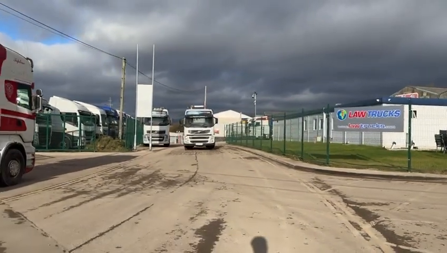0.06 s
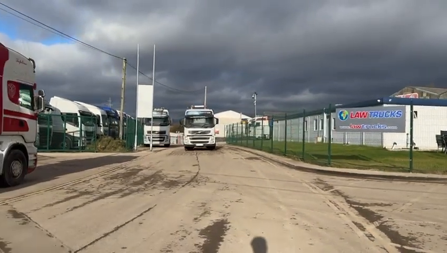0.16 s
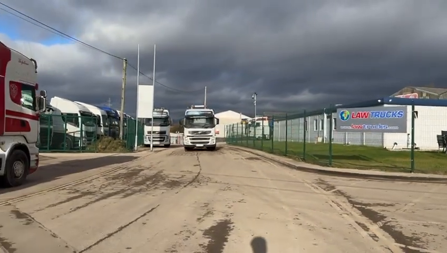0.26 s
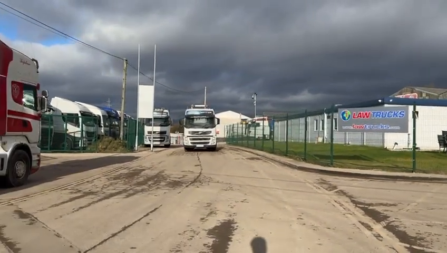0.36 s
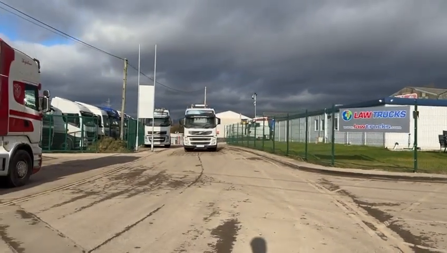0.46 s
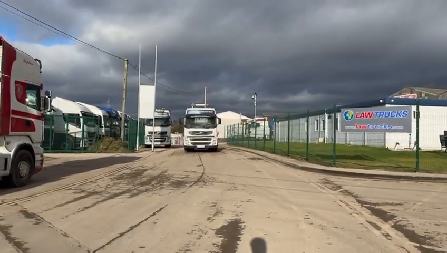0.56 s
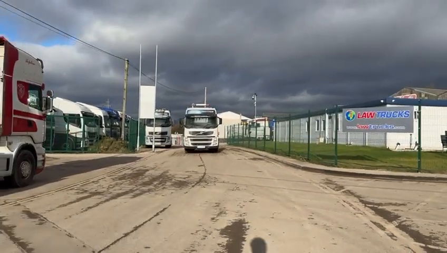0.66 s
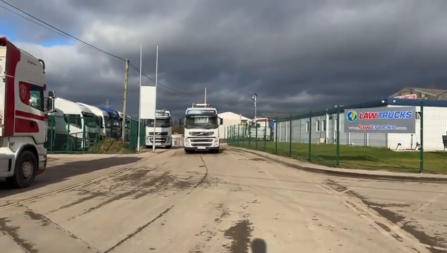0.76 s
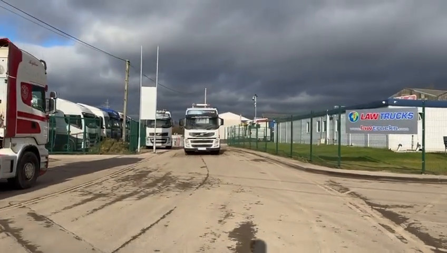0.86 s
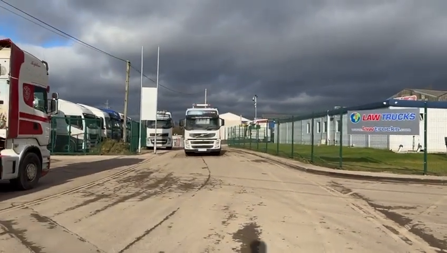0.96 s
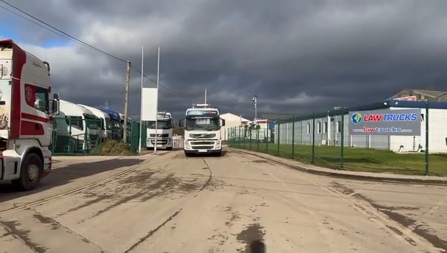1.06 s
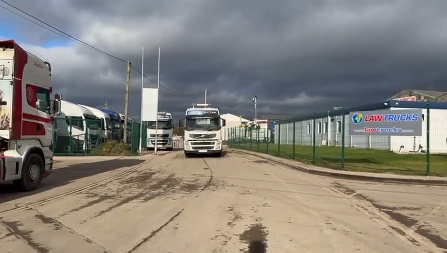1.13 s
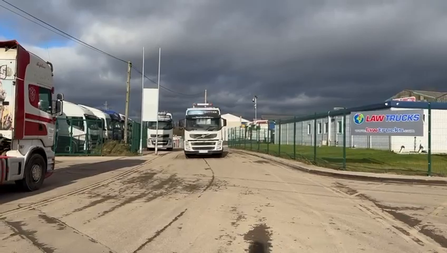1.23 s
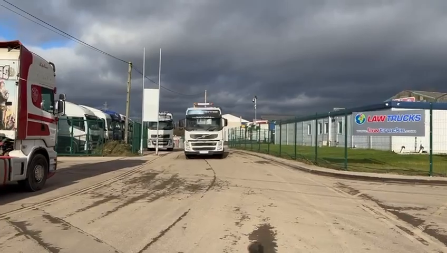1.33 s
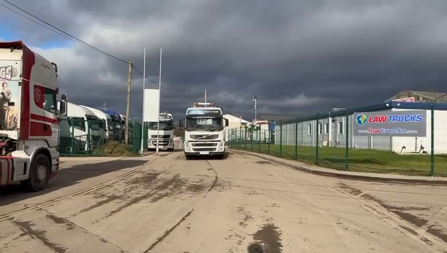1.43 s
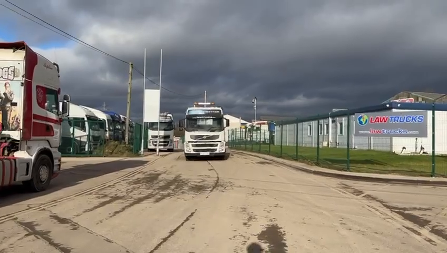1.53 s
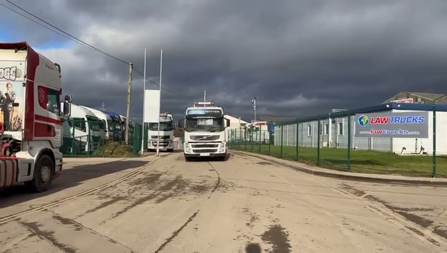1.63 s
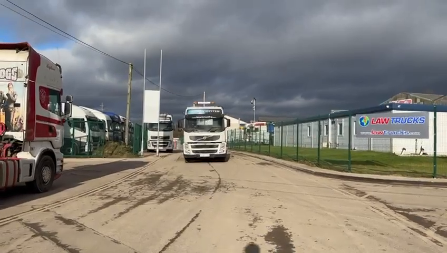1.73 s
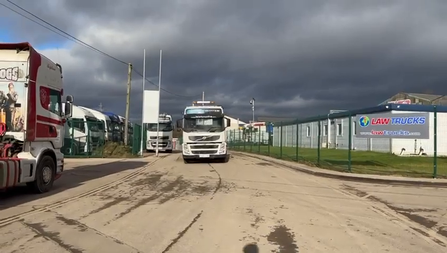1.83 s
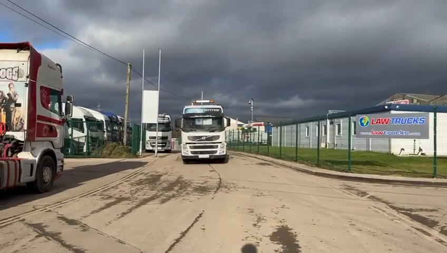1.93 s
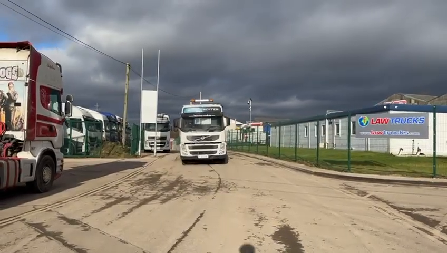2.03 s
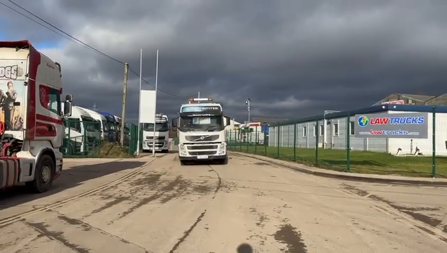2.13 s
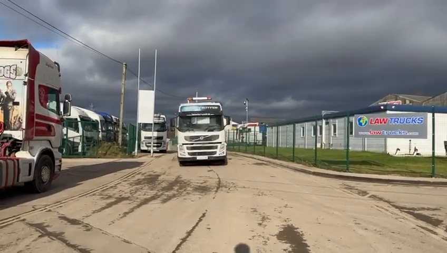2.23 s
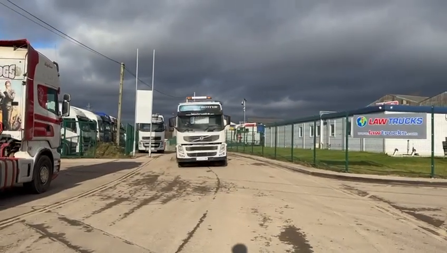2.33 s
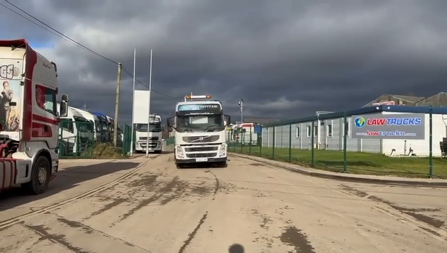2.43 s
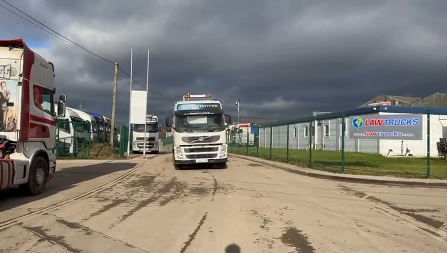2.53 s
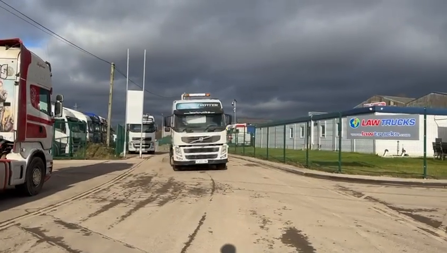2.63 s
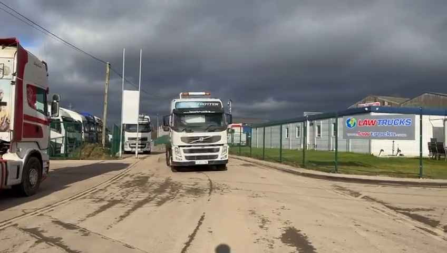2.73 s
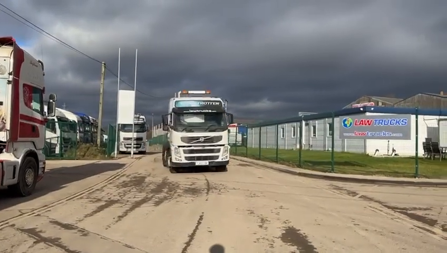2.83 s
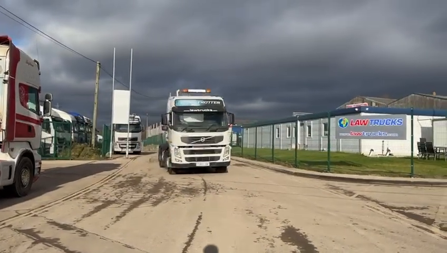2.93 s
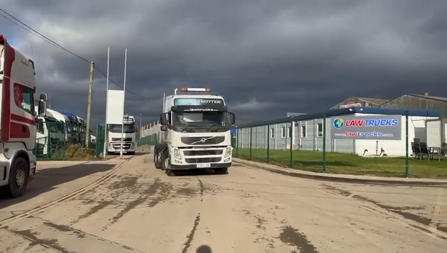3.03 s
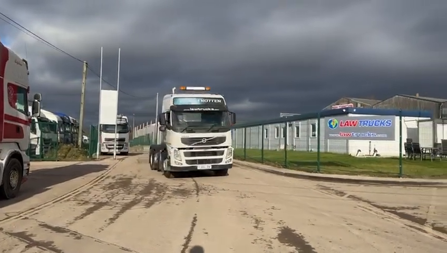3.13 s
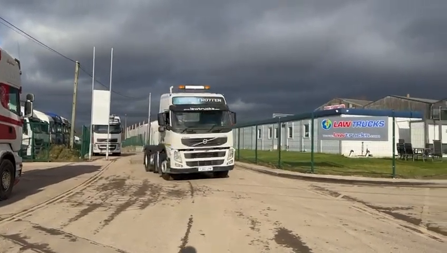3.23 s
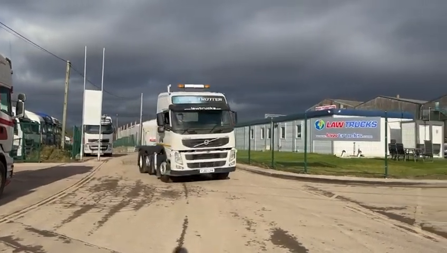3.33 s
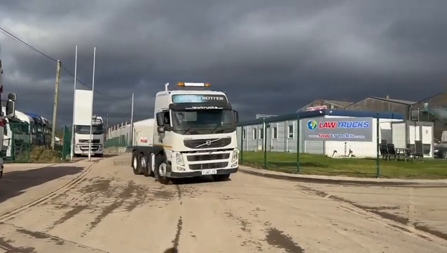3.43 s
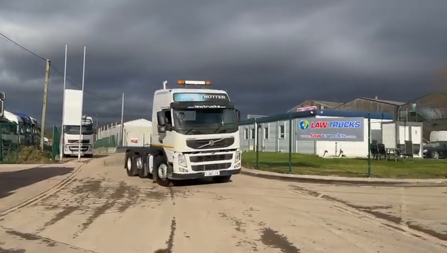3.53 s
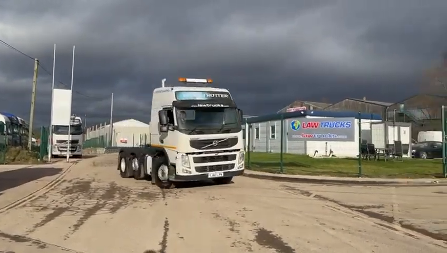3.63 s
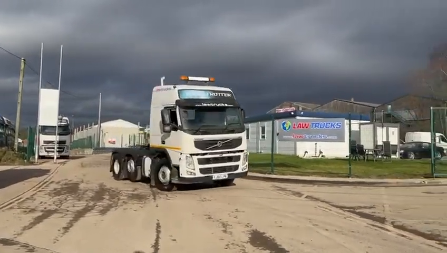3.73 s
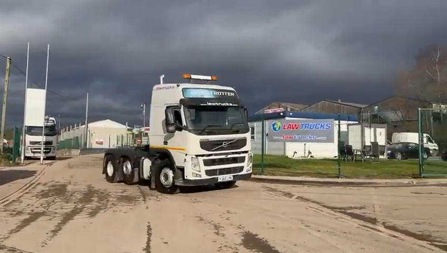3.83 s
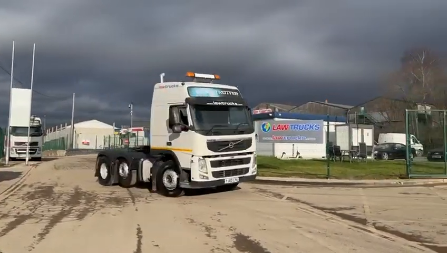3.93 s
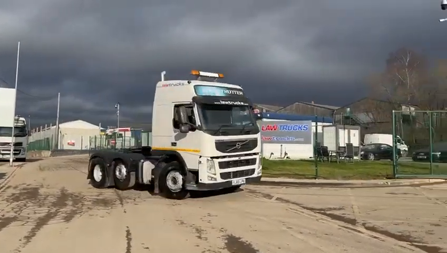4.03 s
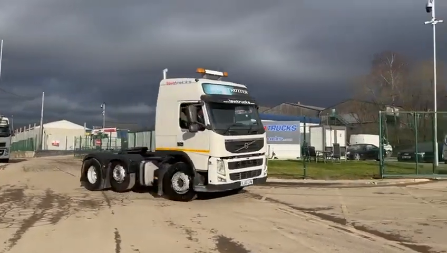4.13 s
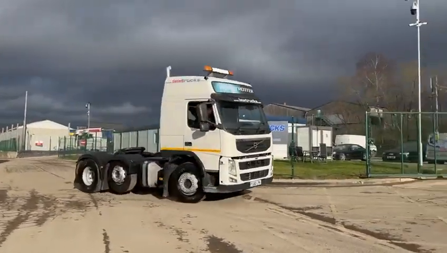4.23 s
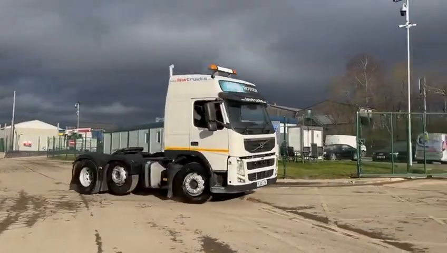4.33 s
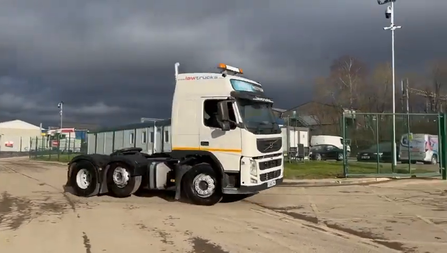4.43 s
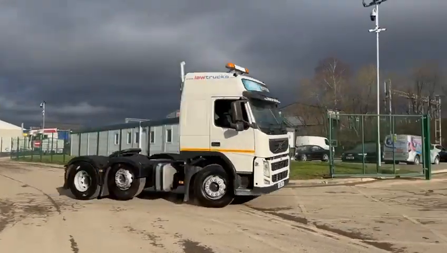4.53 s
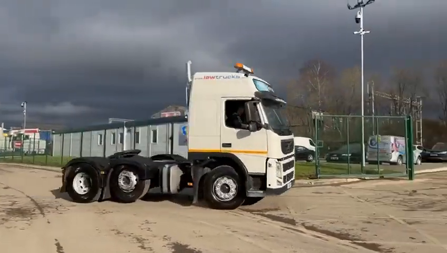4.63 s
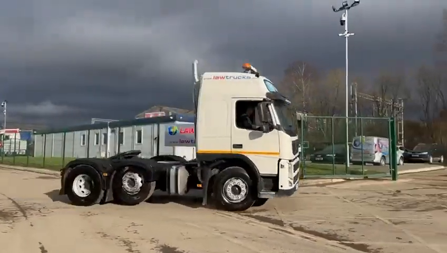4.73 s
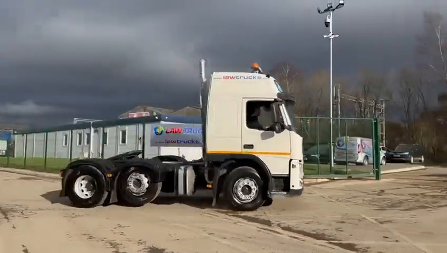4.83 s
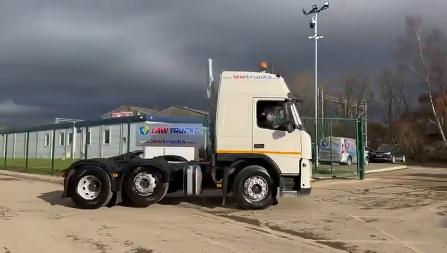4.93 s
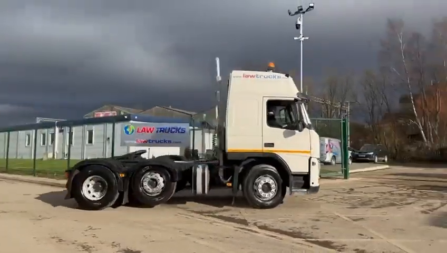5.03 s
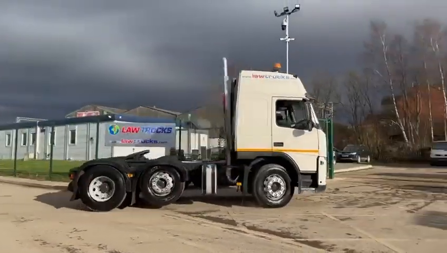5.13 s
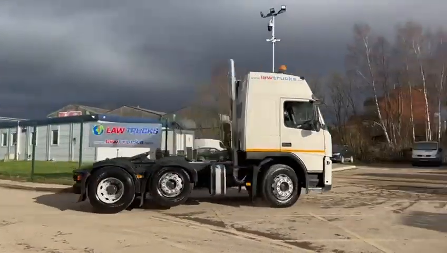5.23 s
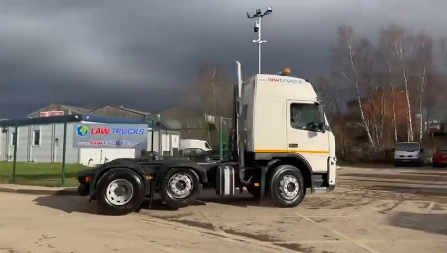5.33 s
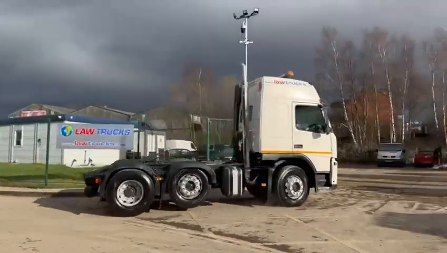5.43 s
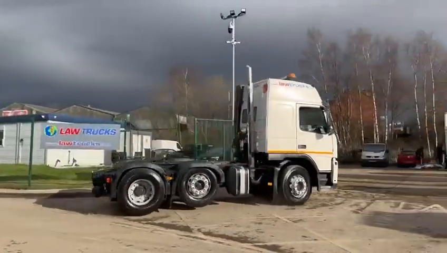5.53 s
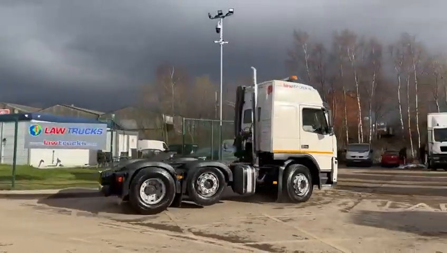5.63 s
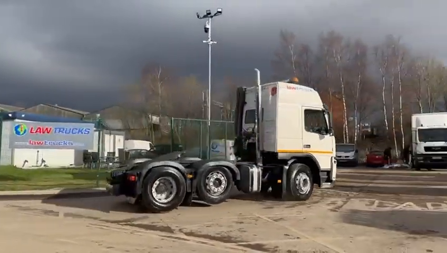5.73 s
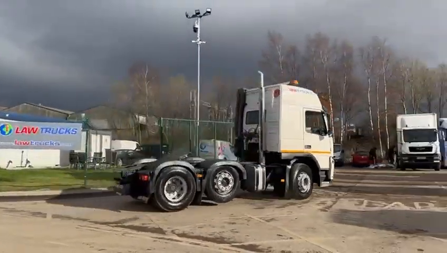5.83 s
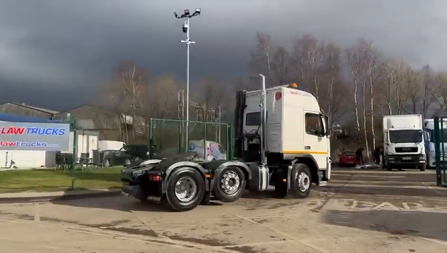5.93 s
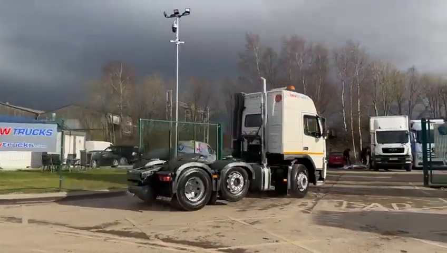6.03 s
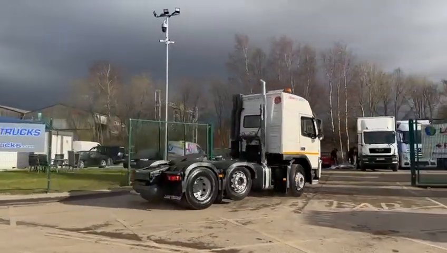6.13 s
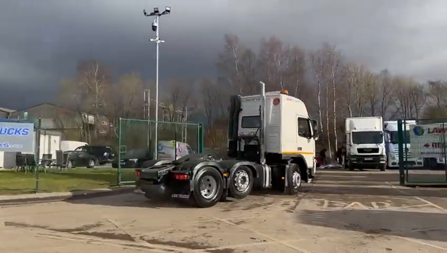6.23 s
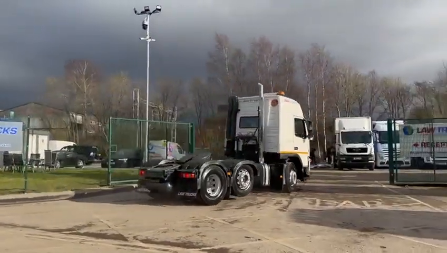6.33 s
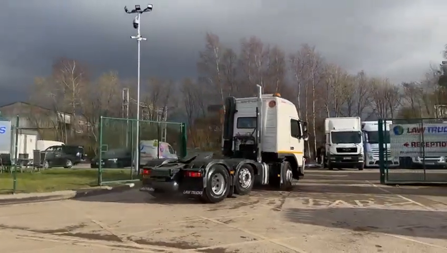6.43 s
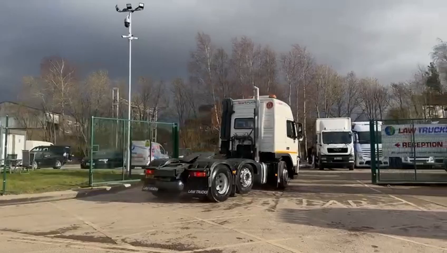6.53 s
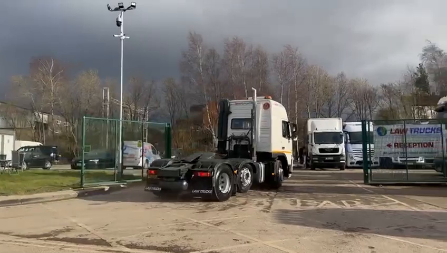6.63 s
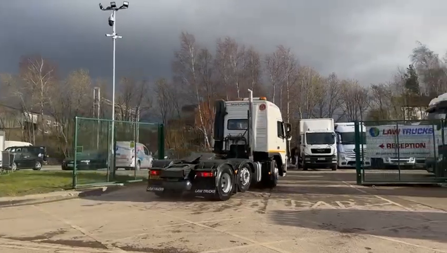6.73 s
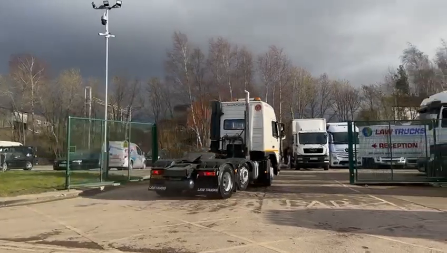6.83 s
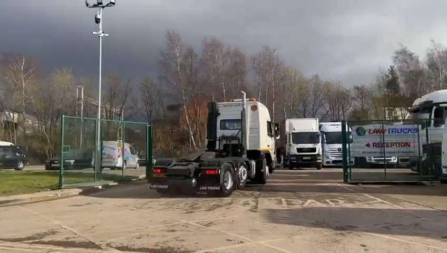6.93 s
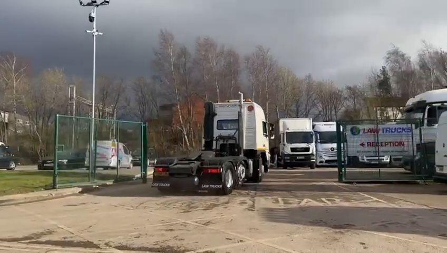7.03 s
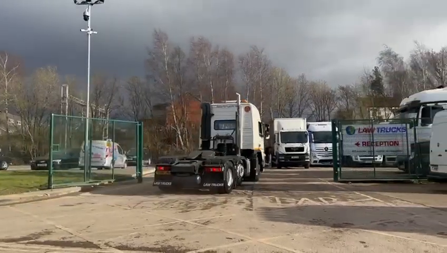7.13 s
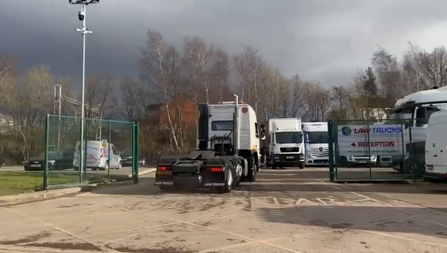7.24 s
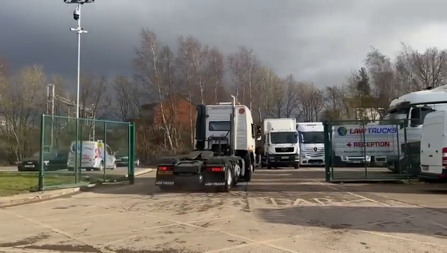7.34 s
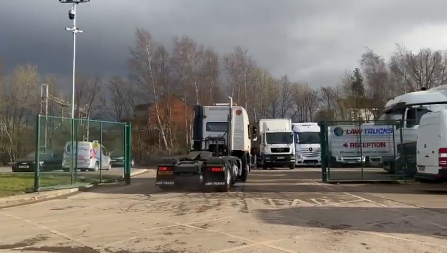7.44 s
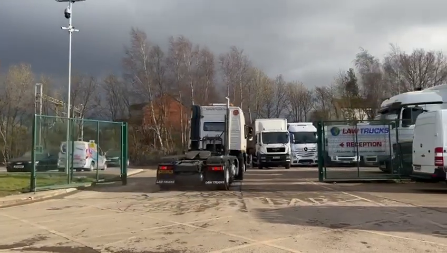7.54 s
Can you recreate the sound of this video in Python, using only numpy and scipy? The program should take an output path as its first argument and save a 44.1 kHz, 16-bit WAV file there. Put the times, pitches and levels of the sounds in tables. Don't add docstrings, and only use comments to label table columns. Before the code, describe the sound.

A heavy diesel lorry booms and clatters closer, hisses air, toots its horn twice, then passes and turns away, dropping in revs.

```python
import sys
import numpy as np
from scipy import signal
from scipy.fft import rfft, irfft, next_fast_len
from scipy.io import wavfile
from scipy.ndimage import uniform_filter1d, minimum_filter1d

SR = 44100
rng = np.random.default_rng(int(sys.argv[2]) if len(sys.argv) > 2 else 0)


def volts_from_decibels(level):
    exponent = np.asarray(level, float) / 20
    return 10 ** exponent


def store_pcm(level_fs):
    pcm = np.round(np.clip(level_fs, -1, 1) * 32767).astype(np.int16)
    wavfile.write(sys.argv[1], SR, np.atleast_2d(pcm).T)


N = 333837
TIME = np.arange(N) / SR


def evened(x):
    return x / np.sqrt(np.mean(x ** 2) + 1e-20)


def along(rows):
    s, *columns = np.transpose(rows)
    return [np.interp(TIME, s, c) for c in columns]


def swell(start, end):
    return np.sin(np.pi * np.clip((TIME - start) / (end - start), 0, 1)) ** 0.5


def shaped(x, points):
    f, db = np.transpose(points)
    size = next_fast_len(len(x))
    hz = np.fft.rfftfreq(size, 1 / SR)
    gain = volts_from_decibels(np.interp(np.log(hz + 1), np.log(f + 1), db))
    return irfft(rfft(x, size) * gain, size)[:len(x)]


def ring(x, hz, width):
    pole = np.exp((2j * np.pi * hz - np.pi * width) / SR)
    return 2 * signal.lfilter([(1 - abs(pole)) ** 2], [1, -2 * pole, pole ** 2], x).real


def resonances(x, rows):
    return sum(volts_from_decibels(db) * ring(x, hz, width) for hz, width, db in rows)


def lumps(hz):
    knots = rng.standard_normal(3000)
    curve = np.interp(TIME * hz, np.arange(len(knots)), knots)
    return evened(uniform_filter1d(curve, int(SR / hz)))


# time_s, level_db
EXHAUST = [(0.0, -22.5), (.1, -33), (.2, -15.5), (.5, -23), (.6, -35), (.7, -21), (.95, -45), (1.85, -53),
           (2.1, -33.5), (2.8, -24.5), (3.5, -39), (3.72, -17.5), (4.0, -15.5), (4.5, -26.5), (4.85, -16),
           (5.25, -17.5), (5.95, -26.5), (6.6, -54)]
# firing_order, from_s, to_s, top_db
DRONES = [(1, -1, 0.13, -38), (1, -2.7, .48, -39), (1, 2, 3.6, -36.5), (1, 3.5, 4.5, -28.5),
          (1, 4.5, 6.03, -25), (2, 6.3, 6.6, -36), (2, 6.85, 7.15, -35), (2, 7.12, 7.85, -22),
          (3, 6.88, 7.2, -30), (3, 5.2, 6.08, -26.5), (3, 0.9, 0.15, -31.5), (3, 1.4, 1.0, -27),
          (3, 6, 5.7, -33), (5, 7, 7.25, -39.5), (4, 6.5, 7.6, -42.5)]
SINGING_ORDERS = np.array([24, 32, 36, 40, 32, 36, 24, 24, 30, 22, 38, 42, 21, 36, 40, 26]) / 6
# from_s, to_s, top_db
SINGING = [(.02, .4, -33), (-.1, .5, -33), (-.1, .35, -35), (.46, .85, -29.5), (.42, .9, -29),
           (.62, 1.08, -34), (.5, 1.08, -36), (4.5, 6.0, -34), (4.3, 5.8, -34), (4.4, 5.6, -36),
           (4.9, 5.5, -33), (5.6, 6.2, -37), (5.5, 6.0, -36), (5.95, 6.25, -36), (3.5, 4.6, -41),
           (3.7, 4.8, -38)]


def exhaust(turns):
    boom = volts_from_decibels(along(EXHAUST)[0]) * np.cos(4 * np.pi * turns + .38)
    for order, start, end, db in DRONES:
        tone = np.cos(2 * np.pi * order * turns + .38 * (order - 1))
        boom += volts_from_decibels(db) * swell(start, end) * tone
    for order, (start, end, db) in zip(SINGING_ORDERS, SINGING):
        tone = np.cos(2 * np.pi * (order * turns + rng.random()))
        boom += volts_from_decibels(db) * swell(start, end) * tone
    return np.sqrt(2) * boom


# pitch_hz, width_hz, level_db
SILENCER = [(200, 118, -4.5), (277.4, 138, 1), (331, 34, 2), (405.5, 48, -4.5), (520, 256, -10.5)]


def silencer(force, fires, puffs):
    clean = 0.41
    drive = np.sqrt(clean) * evened(force * fires) + np.sqrt(1 - clean) * evened(puffs)
    return evened(resonances(drive, SILENCER))


# pitch_hz, width_hz, level_db
KNOCK_RING = [(330, 45, -2), (382, 45, 0), (430, 60, -9)]


def knock(force, fires, cylinder):
    hard = force ** 0.25 * fires * (cylinder == 0)
    start, end = 2.9, 6.35
    near_db = -38 + 3.2 * (TIME - start)
    gain = volts_from_decibels(-45) + volts_from_decibels(near_db) * swell(start, end) ** 2
    return gain * evened(resonances(hard, KNOCK_RING))


# pitch_hz, level_db per Hz
CLATTER = [(280, -59.5), (480, -17), (628, -6), (768, -1), (996, 1.5), (1120, -1.5), (1310, -16.5),
           (1400, -9.5), (1820, -28.5), (3080, -120)]
# pitch_hz, level_db per Hz
HISS = [(760, -17), (1300, -3), (1950, -2), (2160, 1), (2340, 0), (2740, -4), (3860, -4.5), (4370, -9.5),
        (5940, -15), (7400, -15), (8290, -17.5), (9370, -23), (10600, -30.5), (13800, -78), (22000, -120)]


def gated_noise(gate, floor, lump_db, lump_hz, colour):
    noise = (floor + gate) * volts_from_decibels(lump_db * lumps(lump_hz)) * rng.standard_normal(N)
    return evened(shaped(noise, colour))


# pitch_hz, width_hz, from_s, to_s, top_db
NARROW_BANDS = [(525, 136, 1.64, 4.02, -36.5), (1445, 150, 5.8, 7.64, -47.5), (1976, 24, 3.26, 5.7, -49),
                (8250, 190, 0.44, 1, -49.5), (528, 76, 5.8, 7.6, -43.5), (164, 85, 6.6, 5.8, -38),
                (2347, 77, 2.5, 3.5, -49), (370, 90, 6.1, 7.3, -38.5), (5650, 730, 4.3, 5.95, -50)]


def narrow_bands(puffs):
    return sum(volts_from_decibels(db) * swell(start, end) * evened(ring(puffs, hz, width))
               for hz, width, start, end, db in NARROW_BANDS)


# time_s, firings_per_s
SPEED = [(0.0, 55.8), (0.2, 57.2), (0.4, 57.6), (0.55, 54.6), (1.0, 45.5), (1.2, 43.5), (1.45, 47.0),
         (1.7, 54.5), (1.9, 55.8), (2.3, 56.8), (3.3, 57.3), (3.7, 56.1), (4.3, 54.9), (5.3, 51.35),
         (5.75, 50.4), (6.65, 42.2), (7.15, 33.8), (7.57, 30.8)]
# time_s, nearness_db, load (0-1)
ENGINE = [(0.0, -0.5, 0.85), (.3, 0, 0.83), (.55, -4.5, 0.9), (.8, -7.5, 1), (1.0, -5.5, 0.9),
          (1.42, -10.5, 0.05), (1.85, -13, 0.6), (2.0, -7, 0.3), (2.5, -5.5, 0.2), (2.9, -4.5, 0.6),
          (3.3, -5, 0), (3.8, -3, 0), (4.1, 0, 0.4), (4.6, -1.5, .75), (5.3, 0, 0.89), (5.65, 0, .8),
          (6.05, -6, 0.52), (7.57, -15, 0.7)]
CYLINDERS_DB = [-8, -5, -2, 0.5, -8, 0.5]
# from_s, to_s, hiss_gain_db
SIDE_ON = (4.2, 5.97, 1.88)


def engine():
    turns = np.cumsum(along(SPEED)[0]) / SR
    near_db, load = along(ENGINE)
    firings = turns - 6 * .67 + .4 + 6
    count = np.floor(firings).astype(int)
    cylinder = count % 6
    fires = np.diff(count, prepend=count[0]) > 0
    chance_db = 0.99 * rng.standard_normal(count[-1] + 1)[count]
    force = volts_from_decibels(np.take(CYLINDERS_DB, cylinder) + chance_db)
    gate = np.exp(-(firings % 1) / 0.69)
    puffs = (1.2 + force * gate) * rng.standard_normal(N)

    body = volts_from_decibels(-39.5 + near_db + 17.5 * load) * silencer(force, fires, puffs)
    clatter = volts_from_decibels(-28.5 + near_db - 3 * load) * gated_noise(gate, 1.3, 0.61, 12, CLATTER)
    hiss_db = -38.5 + 0.49 * near_db + SIDE_ON[2] * swell(SIDE_ON[0], SIDE_ON[1])
    hiss = volts_from_decibels(hiss_db) * gated_noise(gate, 1.7, 0.5, 15, HISS)
    return exhaust(turns) + body + knock(force, fires, cylinder) + clatter + hiss + narrow_bands(puffs)


# start_s, air_on_s, release_s, level_db, echo_delay_s (near wall)
TOOTS = [
    (1.046, .182, .075, -7, .00554),
    (1.506, .15, .036, -7.5, .00585),
]
TOOT_DB = [-30, -11, 0.8, -2.8, -7.3, -13.5, -26]
TOOT_TREBLE_DB = [-2, -2, 2, -.2, 1.5, 1, -4]
TOOT_BREATH = [.5, .7, .35, .2, .2, .6, .3]
# harmonic, level_db
FIRST_TRUMPET = [(1, 0), (2, -14), (3, -31), (4, -28), (5, -32), (6, -27), (7, -27), (8, -31), (9, -28),
                 (10, -38), (11, -36), (12, -40), (13, -40), (14, -44), (15, -32), (16, -37), (17, -37),
                 (18, -39), (19, -41), (20, -42), (21, -32), (22, -37), (23, -40), (24, -45), (25, -51),
                 (26, -54)]
# harmonic, level_db
SECOND_TRUMPET = [(1, 0), (2, -9), (3, -26), (4, -26), (5, -40), (6, -21), (7, -23), (8, -30), (9, -30),
                  (10, -31), (11, -30), (12, -32), (13, -31), (14, -41), (15, -31), (16, -34), (17, -27),
                  (18, -33), (19, -32), (20, -35), (21, -37), (22, -39), (23, -33), (24, -34), (25, -42),
                  (26, -54)]


def toot(start, hold, release, top_db, orders):
    puff_s, attack_s, settle_s = 0.01, .02, 0.044
    fading = hold + .35 * release
    stages = start + np.array([0, puff_s, attack_s, settle_s, hold, fading, hold + release])
    db, treble_db, breath = along(np.transpose([stages, TOOT_DB, TOOT_TREBLE_DB, TOOT_BREATH]))
    sharp_hz = np.interp(TIME, stages[[0, 3, 4, 6]], [5.5, 0, 0, 15])
    turns = np.cumsum(405.9 + sharp_hz) / SR
    on = slice(round(stages[0] * SR), round(stages[-1] * SR))
    sound = np.zeros(N)
    for k, order_db in orders:
        upper = k > 2
        waver = evened(volts_from_decibels(upper * 2.4 * lumps(26)[on]))
        level = volts_from_decibels(order_db + upper * treble_db[on])
        lag = .6 * (k - 1) ** 2
        sound[on] += level * waver * np.cos(2 * np.pi * k * turns[on] - lag)
    rasp_colour = [(300, -29), (1500, -12.0), (3000, -5.5), (7000, -6), (10500, -18.0), (12500, -67)]
    rasp = evened(shaped(rng.standard_normal(N), rasp_colour))
    sound[on] += (volts_from_decibels(-12) * breath ** 2 * rasp)[on]
    return np.sqrt(2) * volts_from_decibels(top_db + db) * sound


# time_s, level_db
AIR = [(0, -45), (.4, -47), (.5, -38.5), (.75, -41), (1.03, -37.5), (1.09, -53), (1.3, -47.5),
       (1.95, -49.5), (2.2, -64.5)]
# pitch_hz, level_db per Hz
AIR_COLOUR = [(2060, -35), (3500, -6), (5910, -9.5), (6390, -10.5), (6790, -12), (7490, -2.5), (8330, -16),
              (9710, -18.5), (10600, -45.5), (13800, -72), (22000, -120)]


def air():
    return volts_from_decibels(along(AIR)[0]) * evened(shaped(rng.standard_normal(N), AIR_COLOUR))


def sparse_tail(seconds, start):
    taps = np.zeros(int(seconds * SR))
    at = np.arange(start, len(taps) - 20, 20)
    taps[at + rng.integers(0, 20, len(at))] = rng.choice([-1., 1.], len(at))
    return taps


# pitch_hz, t60_s
YARD = [(400, 0.7), (900, 0.29), (2500, 0.38), (9000, 0.11)]


def yard(x):
    hz, t, z = signal.stft(sparse_tail(1, start=1300), SR, nperseg=256)
    t60 = np.interp(hz, *np.transpose(YARD))[:, None]
    tail = signal.istft(z * volts_from_decibels(-60 * t / t60), SR, nperseg=256)[1]
    return signal.fftconvolve(x, tail / np.linalg.norm(tail))[:N]


def scattered(x):
    z = signal.stft(x, nperseg=1024, noverlap=768)[2]
    phases = np.exp(2j * np.pi * rng.random(z.shape))
    return 2 * signal.istft(z * phases, nperseg=1024, noverlap=768)[1][:N]


# pitch_hz, level_db
RUMBLE_COLOUR = [(20, -32), (35, -8), (60, 4.5), (90, 2), (170, 1), (260, -4), (500, -7), (900, -54),
                 (3000, -93)]
# from_s, to_s, gain_db
BREEZE = [
    (0.434, 0.898, 4),
    (1.03, 2.094, 7),
    (2.698, 3.34, 3),
    (5.2, 5.745, -1),
]
# time_s, peak_db, length_s, brightness_hz
GUSTS = [(.08, -24.5, 0.064, 150), (.2, -21, 0.044, 400), (1.0, -24.5, 0.077, 250),
         (1.15, -20.5, 0.025, 200), (1.211, -18.5, 0.022, 433), (1.28, -43.5, 0.054, 200),
         (1.339, -41.5, 0.055, 150), (1.48, -24, 0.089, 350), (1.7, -34.5, 0.052, 600),
         (1.771, -26, .08, 200), (1.935, -19.5, .012, 600), (1.95, -18.5, 0.027, 130),
         (1.965, -31, 0.0053, 450), (2.002, -24.5, 0.036, 220), (2.361, -19.5, 0.019, 150),
         (2.422, -26, 0.029, 250), (2.85, -43.5, 0.039, 200), (3.101, -23, 0.044, 250),
         (6.1, -26.5, 0.075, 300), (6.375, -22.5, 0.055, 150), (7.043, -42, 0.033, 150)]


def wind():
    breeze_db = sum(db * swell(start, end) for start, end, db in BREEZE)
    rumble_db = -30.5 + 0.39 * along(ENGINE)[0] + breeze_db + 2.13 * lumps(20)
    out = volts_from_decibels(rumble_db) * evened(shaped(rng.standard_normal(N), RUMBLE_COLOUR))
    t = (np.arange(8192) - 4096) / SR
    for s, db, length, hz in GUSTS:
        colour = [(35, -28), (85, 0), (hz, 0), (2 * hz, -14), (4 * hz, -40), (16 * hz, -110)]
        bump = evened(shaped(rng.standard_normal(8192), colour))
        bump *= volts_from_decibels(db) * np.exp(-(2 * t / length) ** 2)
        part = out[max(round(s * SR) - 4096, 0):][:8192]
        part += bump[-len(part):]
    return out


# pitch_hz, level_db
ECHO_COLOUR = [(420, -22), (800, -16), (1600, -11), (2400, -14), (6000, -19)]


def scene():
    toots = [toot(*row[:4], orders) for row, orders in zip(TOOTS, (FIRST_TRUMPET, SECOND_TRUMPET))]
    horn = sum(toots)
    wall = volts_from_decibels(-11) * sum(np.roll(sound, round(row[4] * SR)) for row, sound in zip(TOOTS, toots))
    echoes = shaped(yard(horn), ECHO_COLOUR)
    horn_level = np.sqrt(abs(uniform_filter1d(horn ** 2, 1500)))
    duck = 1 / (1 + 4.5 * horn_level)
    air_bumps = wind()
    rest = duck * (engine() + air()) + air_bumps + echoes
    side = 0.4 * scattered(rest) + .5 * scattered(air_bumps) - wall
    return np.array([horn + rest + side, horn + rest - side])


def gated(x, under_db, chance_db):
    hz, _, z = signal.stft(x, SR, nperseg=1024, noverlap=768)
    power = abs(z) ** 2
    loudest = -minimum_filter1d(-power, size=15, axis=0)
    patches = rng.standard_normal((len(hz) // 5 + 1, z.shape[1] // 6 + 1))
    chance = np.kron(patches, np.ones((5, 6)))[:len(hz), :z.shape[1]]
    limit = loudest * volts_from_decibels(2 * (under_db + chance_db * chance))
    smooth = uniform_filter1d(uniform_filter1d(power, size=3, axis=0), size=4, axis=1)
    muted = (smooth < limit) & (hz[:, None] > 1200)
    return signal.istft(z * np.where(muted, .03, 1), nperseg=1024, noverlap=768)[1][:N]


def low_pass(x):
    return signal.sosfilt(signal.butter(12, 10850, fs=SR, output="sos"), x)


# pitch_hz, side_minus_mid_db
PORTS = [(60, -19), (89, -29.5), (130, -8.5), (200, -15), (290, -14.5), (430, -7), (640, 1.5), (960, -7.5),
         (1420, 11.5), (2110, -6), (3130, -3), (4650, -3.5), (6900, -3), (10200, 7.5)]
# pitch_hz, level_db
NOTCHES = [(4000, 0), (4300, -5), (4600, 0), (6950, 0), (7450, -19), (7850, 0), (9800, 0), (10500, -9)]


def record(dry):
    mid = dry.mean(0)
    turned = signal.hilbert(mid, next_fast_len(N))[:N].imag
    difference = (dry[0] - dry[1]) / 2 - 0.55 * turned
    side = shaped(shaped(difference, PORTS), NOTCHES)
    mid = gated(shaped(mid, NOTCHES), under_db=-14, chance_db=4.5)
    limited = 1.6 * np.tanh(np.array([mid + side, mid - side]) / 1.6)
    return low_pass(limited)


dry = scene()
out = record(dry)
store_pcm(out)
```